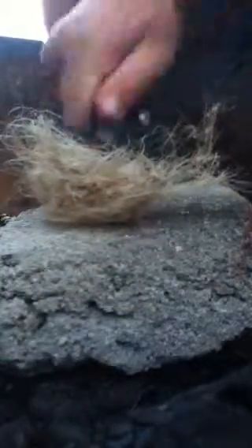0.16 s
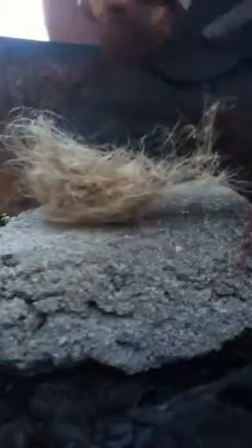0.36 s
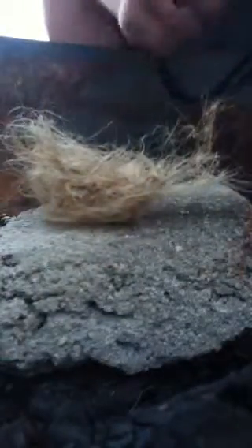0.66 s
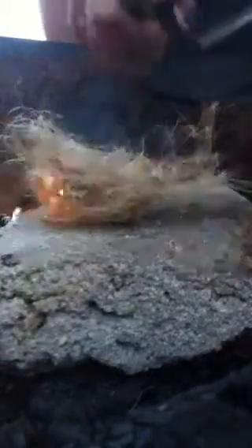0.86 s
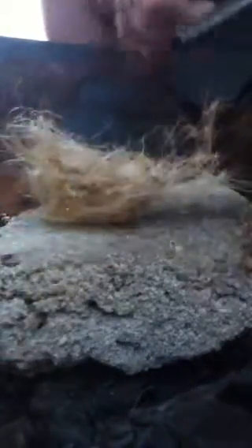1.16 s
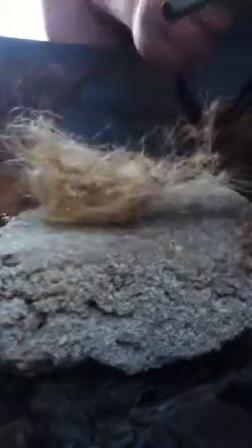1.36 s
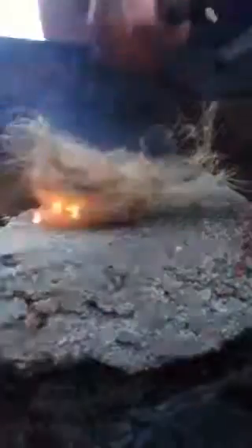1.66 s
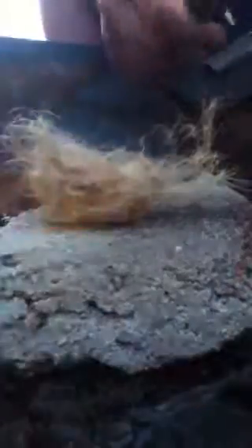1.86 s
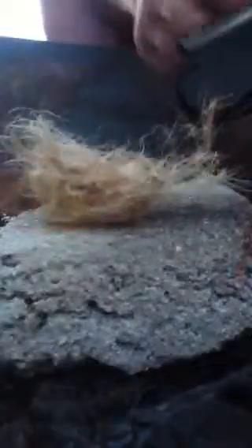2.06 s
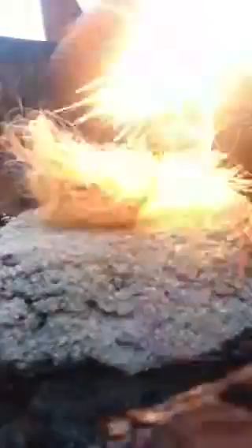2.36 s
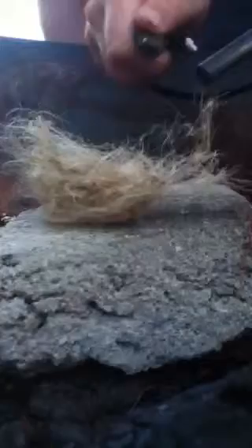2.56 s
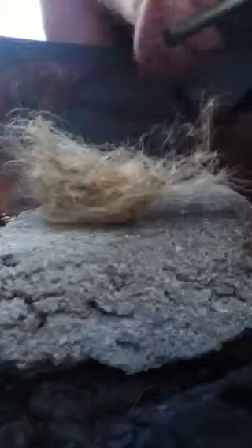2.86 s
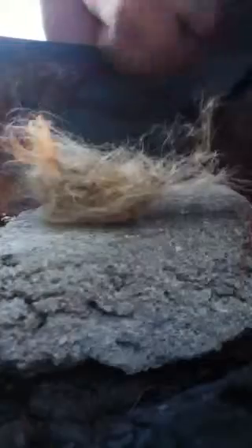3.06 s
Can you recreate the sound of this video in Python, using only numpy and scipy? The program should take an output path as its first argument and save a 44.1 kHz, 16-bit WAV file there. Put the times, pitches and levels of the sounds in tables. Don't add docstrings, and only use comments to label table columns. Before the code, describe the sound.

A steel striker scrapes hard down a fire rod four times, each a brief gritty, ringing rasp. Light back-slides, metallic taps and popping sparks fall between, close to a phone outdoors over faint traffic rumble.

```python
import sys
import numpy as np
from scipy import signal
from scipy.fft import rfft, irfft, next_fast_len
from scipy.io import wavfile
from scipy.ndimage import uniform_filter1d

SR = 44100
rng = np.random.default_rng(int(sys.argv[2]) if len(sys.argv) > 2 else 0)


def generate_wav(sig):
    pcm = np.round(np.clip(np.atleast_2d(sig).T, -1, 1) * 32767).astype(np.int16)
    wavfile.write(sys.argv[1], SR, pcm)


def ratio(d):
    e = np.asarray(d, float) / 20
    return 10 ** e


N = 141120
T = np.arange(N) / SR


def unit(x):
    return x / np.sqrt(np.mean(x ** 2))


def colour(x, points):
    hz, db = np.array(points, float).T
    log_hz = np.log(np.maximum(np.arange(4097) * SR / 8192, 1))
    curve_hz = np.r_[hz[0] / 3, hz, hz[-1] * 2]
    curve_db = np.r_[db[0] - 30, db, db[-1] - 20]
    gain = ratio(np.interp(log_hz, np.log(curve_hz), curve_db))
    cepstrum = irfft(np.log(gain))
    cepstrum[1:4096] *= 2
    cepstrum[4097:] = 0
    response = irfft(np.exp(rfft(cepstrum)))
    return signal.fftconvolve(x, response)[:N]


def band(x, hz, width):
    return signal.lfilter(*signal.iirpeak(hz, hz / width, SR), x)


def walk(rate):
    k = int(SR / rate)
    steps = np.repeat(rng.standard_normal(N // k + 1), k)
    return unit(uniform_filter1d(uniform_filter1d(steps, k), k)[:N])


def ring(modes, stretch=1, rise_s=1e-5):
    t = T[:int(.09 * SR)]
    tones = 0
    for k, (hz, db, t60) in enumerate(modes):
        tones = tones + (-1) ** k * ratio(db - 60 * t / t60) * np.sin(2 * np.pi * hz * stretch * t)
    return (1 - np.exp(-(t / rise_s) ** 2)) * tones


def add(out, s, x):
    i = int(s * SR)
    out[i:i + len(x)] += x[:N - i]


def ragged(x, count=14):
    size = next_fast_len(N)
    spectrum = rfft(x, size)
    place = np.linspace(0, count, len(spectrum))
    out = np.zeros(N)
    for k in range(count + 1):
        piece = irfft(spectrum * np.clip(1 - abs(place - k), 0, 1), size)[:N]
        out += ratio(3 * walk(180)) * piece
    return out


def tear_grit():
    grains_per_s, spread_db = 16000, 2.1
    chance = rng.random((3, N))
    hits = chance[0] < grains_per_s / SR
    size = ratio(-spread_db * np.log(chance[2]))
    grains = unit(hits * np.sign(chance[1] - .5) * size)
    return unit(grains * ratio(2.5 * walk(800)))


def grit_noise(grit, gain, points):
    return colour(gain * grit, points) / np.std(colour(grit, points))


def patchy_rings(drive, table):
    power = sum(ratio(2 * db) * np.pi * width / SR for hz, width, db in table)
    out = np.zeros(N)
    for k, (hz, width, db) in enumerate(table):
        tone = band(band(drive, hz, 2 * width), hz, 2 * width)
        out += (-1) ** k * ratio(db + 2.5 * walk(220)) * tone
    return out / np.sqrt(power)


def edge_rasp(grit, gain):
    # pitch_hz, level_db
    grit_colour = [(1000, -25.5), (1400, -6), (3000, -3), (3800, -3.5), (5500, -5.5), (8600, -3.5),
                   (12000, -5), (16000, -12)]
    return ragged(grit_noise(grit, gain, grit_colour))


def strokes(grit):
    # start_s, level_db, handle ring_db over that level
    pressures = [
        [(.25, -42.5, -5), (.258, -56, -10), (.265, -39.5, -17), (.284, -32, -16), (.289, -27, -12),
         (.294, -35.5, 8), (.305, -30, 9), (.313, -34, -6), (.319, -64, -5)],
        [(.868, -46.5, -8), (.886, -33.5, -6), (.9, -25, -1.5), (.906, -19, -8), (.92, -21, -9.5),
         (.94, -27, -5), (.956, -37, -15), (.992, -44, -5), (.998, -66, 0)],
        [(1.643, -64, -7), (1.657, -36, -19), (1.672, -36, -15), (1.678, -25.5, -7), (1.692, -19, -10),
         (1.704, -20.5, -5.5), (1.722, -30, -6), (1.757, -34, -11), (1.764, -51, 7)],
        [(2.494, -67, -6), (2.5, -41, -14), (2.513, -38, -12), (2.517, -43, -2), (2.524, -25.5, -2.5),
         (2.542, -16.5, -7.5), (2.553, -22, -6.5), (2.559, -42.5, 4), (2.6, -59, -2)],
    ]
    # pitch_hz, width_hz, level_db
    handles = [
        [(1930, 160, -2), (2274, 104, -0.5), (2950, 400, -0.5)],
        [(1400, 340, -1), (1950, 520, -1.5), (2950, 440, -8)],
        [(1570, 185, 6), (2170, 1370, -2), (2940, 800, -4)],
        [(1294, 390, 3), (1900, 1200, -8), (2750, 620, 3.5)],
    ]
    # pitch_hz, level_db
    rods = [
        [(4900, -2.5), (5690, 0), (10700, -6)],
        [(5650, -1), (8740, 6), (10400, -8), (11700, 4)],
        [(4600, -10), (5400, 6), (8400, -4.5), (10200, 8)],
        [(5240, -0.5), (5690, 7), (8200, -4), (10300, 5.5)],
    ]
    rod_levels = [-1.5, -4.5, -6.5, -7.5]
    thump_levels = [-9, -6.5, -7, -11]
    # pitch_hz, level_db
    thump_colour = [(60, -9), (120, 0), (230, 0.5), (500, -5), (800, -7.5), (1000, -12), (1300, -4.5),
                    (1800, -14.5)]
    press, hand, out = np.zeros((3, N))
    for curve, handle, rod, rod_db, thump_db in zip(pressures, handles, rods, rod_levels, thump_levels):
        s, db, ring_db = np.array(curve).T
        gain = ratio(np.interp(T, s, db, -200, -200))
        press += gain
        hand += gain ** 1.089 * ratio(thump_db + 3.5)
        out += patchy_rings(gain * ratio(np.interp(T, s, ring_db)) * grit, handle)
        rod_rings = [(hz, 320, level) for hz, level in rod]
        out += patchy_rings(gain * ratio(rod_db) * grit, rod_rings)
    return out + edge_rasp(grit, press) + grit_noise(grit, hand, thump_colour)


def slides(grit):
    # start_s, length_s, level_db
    slide_times = [
        (0.677, 0.049, -47),
        (1.422, 0.072, -50.5),
        (2.98, 0.055, -51.5),
        (3.196, .02, -46),
    ]
    fade_s = 0.0066
    gain = np.zeros(N)
    for s, length, db in slide_times:
        gain += ratio(db) * np.clip(np.minimum(T - s, s + length - T) / fade_s, 0, 1)
    slide_rings = [(2100, 400, 2), (5900, 200, 2), (8500, 1900, -16), (10740, 150, -3)]
    return patchy_rings(gain * ratio(-7.0) * grit, slide_rings) + edge_rasp(grit, gain)


def bites():
    # start_s, peak_db, pitch_hz, t60_s (time to die by 60
    # dB)
    bite_times = [(.2695, -32, 5060, 0.009), (0.274, -27, 4800, .012), (.274, -24, 2300, 0.013),
                  (.288, -17.5, 4740, 0.013), (.289, -19, 1950, .022), (0.294, -16.5, 2950, 0.027),
                  (.302, -16.5, 2950, 0.031), (.301, -18, 1930, .022), (.2985, -26, 10000, .02),
                  (0.308, -23.5, 10200, 0.023), (.3065, -29, 12700, 0.018), (.8985, -23.5, 3040, .03),
                  (0.9036, -16, 8840, 0.033), (0.9055, -19, 10300, .03), (.9045, -15.5, 11710, .03),
                  (.9045, -24, 5670, .025), (.905, -18, 3044, .04), (.906, -23, 1950, .03),
                  (.915, -18, 8760, 0.022), (.914, -22, 1326, 0.045), (1.677, -27, 1900, .02),
                  (1.688, -17.5, 2650, 0.032), (1.69, -15.5, 8600, .025), (1.697, -18.5, 3220, 0.023),
                  (1.699, -18.5, 1570, 0.043), (2.2957, -34.5, 5900, 0.014), (2.2962, -33, 7000, 0.0068),
                  (2.519, -28, 10300, 0.028), (2.5341, -14.5, 2750, 0.041), (2.536, -14, 5200, 0.033),
                  (2.5415, -13, 7830, 0.018), (2.544, -17, 5380, 0.022), (2.546, -20, 10200, 0.035),
                  (2.546, -21.5, 1674, 0.038)]
    out = np.zeros(N)
    for s, db, hz, t60 in bite_times:
        add(out, s, ring([(hz, db, t60), (hz * 1.03, db - 3.5, t60)], rise_s=0.00045))
    return out


def jolts():
    # start_s, peak_db, pitch_hz, t60_s
    jolt_times = [(.909, -23, 230, .06), (.922, -24, 223, 0.068), (.91, -37, 494, 0.033),
                  (1.696, -18, 131, 0.043), (1.696, -26, 330, 0.05), (1.697, -31, 545, .04),
                  (2.538, -18.5, 213, 0.097), (2.54, -21, 492, 0.026), (2.54, -22, 867, 0.039)]
    out = np.zeros(N)
    for s, db, hz, t60 in jolt_times:
        add(out, s, ring([(hz, db, t60)], rise_s=0.0054))
    return out


def taps():
    # start_s, peak_db, click_db, click_hz, knock_db
    tap_times = [
        (0.6757, -11.5, 2, 8500, -7.5),
        (1.4106, -23, 6, 6700, -2),
        (2.988, -20, 13, 8200, -7.5),
    ]
    # pitch_hz, level_db, t60_s
    rod = [(5700, -3.5, 0.023), (10370, -8.5, 0.018), (4400, -30, 0.021)]
    # pitch_hz, level_db, t60_s
    strikers = [
        [(7040, 0, 0.0084), (7650, 8, 0.0052), (8300, -1, 0.0043)],
        [(6440, 0, .004), (5900, -5, .012), (10340, -2.5, 0.02), (12340, -7, .005)],
        [(6000, -5, .005), (6750, 2, .006), (4300, -9, .006), (8900, -6, .005), (3100, -13, .008)],
    ]
    # pitch_hz, level_db, t60_s
    knock = [(2030, 1, 0.012), (2240, -14.5, 0.0094), (2760, -6.5, 0.0073), (3230, -18, 0.0024)]
    # pitch_hz, level_db, t60_s
    graze = [(1970, 3.5, 0.0091), (3600, -5, .012), (5900, -3, 0.015), (8000, 9, 0.0033), (9500, -3, .004),
             (10400, -10, 0.011), (11500, -5, 0.0045)]
    contact_s, click_s = .00014, .0001
    out = np.zeros(N)
    t = T[:int(.09 * SR)] - 2 * click_s
    stretches = 1 + .004 * rng.standard_normal((len(tap_times), 2))
    for (s, db, click_db, click_hz, knock_db), steel, stretch in zip(tap_times, strikers, stretches):
        click = np.exp(-(t / click_s) ** 2) * np.sin(2 * np.pi * click_hz * t)
        hit = ring(rod, rise_s=contact_s) + ring(steel, stretch[0], contact_s)
        hit += ring(knock, stretch[1], 2 * contact_s) * ratio(knock_db)
        hit += ratio(click_db) * click
        add(out, s, ratio(db) * hit)
    add(out, 2.2936, ratio(-27.5) * ring(graze, rise_s=contact_s))
    return out


def finger_knocks():
    # start_s, peak_db, pitch_hz
    knock_times = [(.6855, -20, 2450), (.725, -33, 850), (.988, -27, 1400), (1.002, -34, 850),
                   (2.606, -36, 1800)]
    out = np.zeros(N)
    for s, db, hz in knock_times:
        add(out, s, ring([(hz, db, .007)], rise_s=0.00039))
    return out


def sparks():
    # start_s, peak_db
    pops = [(.5145, -45), (0.946, -21), (.962, -26), (0.969, -24), (0.9781, -22), (.982, -27),
            (.987, -23.5), (0.99, -28), (1.0075, -35), (1.0115, -38), (1.026, -38), (1.768, -36),
            (1.774, -32), (1.783, -35), (1.797, -40), (1.805, -35), (1.813, -37), (1.8376, -39),
            (2.275, -40), (2.2785, -48), (2.5692, -20.5), (2.584, -41), (2.6058, -33.5), (2.6097, -36)]
    # start_s, peak_db, pitch_hz
    snaps = [(.2893, -14, 9000), (1.6942, -6.5, 7100), (1.703, -15, 6000), (1.728, -12, 4950),
             (1.7557, -8.5, 4800), (2.5391, -14, 6900)]
    out, t = np.zeros(N), T[:400]
    for s, db in pops:
        fizz = rng.standard_normal(400)
        add(out, s, ratio(db + 4 - 60 * t / 0.0084) * np.minimum(t / .0004, 1) * fizz)
    out = signal.sosfilt(signal.butter(1, 9000, fs=SR, output="sos"), out)
    for s, db, hz in snaps:
        add(out, s, ring([(hz, db + 6, .0008)]))
    return signal.sosfilt(signal.butter(2, 1130, "high", fs=SR, output="sos"), out)


def embers(grit):
    # start_s, level_db, t60_s
    ember_times = [
        (1.004, -54, .2),
        (1.76, -44.5, 0.3),
        (2.558, -51, 0.22),
    ]
    # pitch_hz, level_db
    ember_colour = [(1200, -8), (2500, 1), (6000, -2), (10000, -11), (15000, -18)]
    gain = np.zeros(N)
    for s, db, t60 in ember_times:
        gain += (T > s) * ratio(db - 60 * np.maximum(T - s, 0) / t60)
    return grit_noise(grit, gain, ember_colour)


def yard_echo(near):
    t = T[:int(.2 * SR)]
    tail = rng.standard_normal(len(t)) * ratio(-60 * t / .1) * (t > .003)
    tail /= np.sqrt(np.sum(tail ** 2))
    return ratio(-31) * signal.fftconvolve(near, tail)[:N]


def bird():
    # start_s, length_s, pitch_hz, level_db
    bird_notes = [
        (.528, .045, 4300, -63),
        (.548, .058, 3600, -62),
        (.582, .053, 3200, -60),
    ]
    sag_hz_per_s = 3500
    out = np.zeros(N)
    for s, length, hz, db in bird_notes:
        t = T - s
        swell = np.sqrt(np.clip(np.sin(np.pi * np.clip(t / length, 0, 1)), 0, 1))
        tone = np.sin(2 * np.pi * (hz - sag_hz_per_s * t / 2) * t)
        out += ratio(db) * swell * walk(800) * np.sqrt(2) * tone
    return out


def traffic():
    # pitch_hz, level_db per Hz
    rumble_colour = [(20, -6.5), (60, -2), (115, -3), (235, -6.5), (280, -17.5), (550, -22), (1700, -28),
                     (2300, -40)]
    rumble = colour(rng.standard_normal(N), rumble_colour)
    low = signal.sosfilt(signal.butter(2, 45, fs=SR, output="sos"), rumble)
    out = unit(rumble) * ratio(-40 + .7 * walk(1.5))
    out += unit(low) * ratio(-51.5 + 1.6 * walk(4.4))
    surge = np.exp(-((T - 1.814) / 0.17) ** 2) * unit(band(rng.standard_normal(N), 1530, 410))
    return out + ratio(-52.5) * surge


def motor():
    # pitch_hz, width_hz, level_db
    motor_tones = [(58.3, 9.2, -47.5), (111, 6.8, -48.5), (237.4, 28, -53.5)]
    out = np.zeros(N)
    for hz, width, db in motor_tones:
        out += ratio(db) * unit(band(rng.standard_normal(N), hz, width))
    whine_hz = 739 + 4 * walk(10)
    whine = np.sin(2 * np.pi * np.cumsum(whine_hz) / SR)
    return out + whine * ratio(-60 + 3 + 3 * walk(6))


def hiss():
    # pitch_hz, level_db per Hz
    hiss_colour = [(1500, -11), (3000, 0), (6000, -4), (11000, -4.5), (13500, -9.5), (15000, -7.5),
                   (15600, -8.5)]
    return unit(colour(rng.standard_normal(N), hiss_colour)) * ratio(-61.5)


def scene():
    grit = tear_grit()
    near = strokes(grit) + slides(grit) + bites() + jolts() + taps() + finger_knocks()
    near += sparks() + embers(grit)
    return (near + yard_echo(near) + bird() + traffic() + motor() + hiss())[None]


def low_pass(x):
    return signal.sosfilt(signal.butter(12, 17070, fs=SR, output="sos"), x)


def record(dry):
    # start_s, length_s, above_hz
    dropouts = [(.24, .011, 3600), (.319, .013, 4500), (.658, .012, 4200), (.67, .002, 9000),
                (.867, .003, 2500), (.998, .007, 4000), (1.402, .005, 2700), (1.417, .004, 11200),
                (1.634, .01, 4000), (1.791, .003, 5000), (2.284, .005, 4500), (2.492, .004, 1800),
                (2.98, .003, 3000), (2.994, .007, 9000), (3.189, .007, 3500)]
    x = signal.sosfilt(signal.ellip(10, .2, 60, 15800, fs=SR, output="sos"), dry)
    for s, length, hz in dropouts:
        near = slice(int((s - .02) * SR), int((s + length + .02) * SR))
        gap = np.clip(np.minimum(T[near] - s, s + length - T[near]) / .001 + 1, 0, 1)
        highpass = signal.butter(8, hz, "high", fs=SR, output="sos")
        x[:, near] -= gap * signal.sosfiltfilt(highpass, x[:, near])
    return low_pass(x)


dry = scene()
out = record(dry)
generate_wav(out)
```